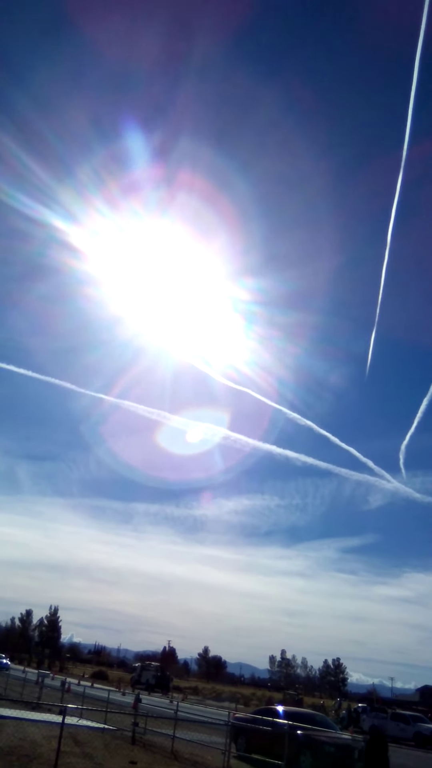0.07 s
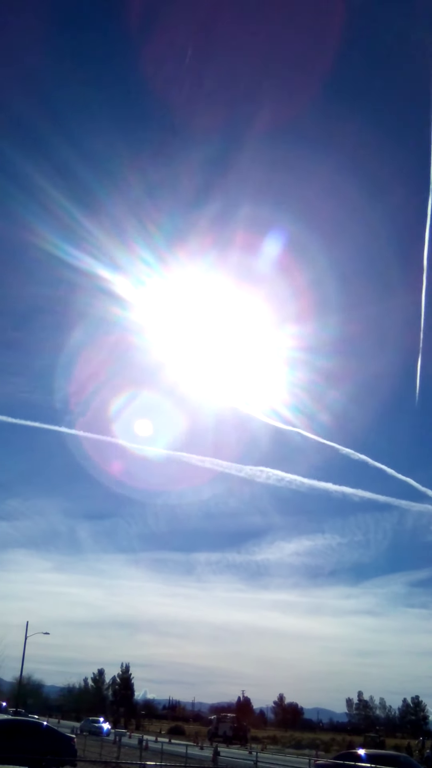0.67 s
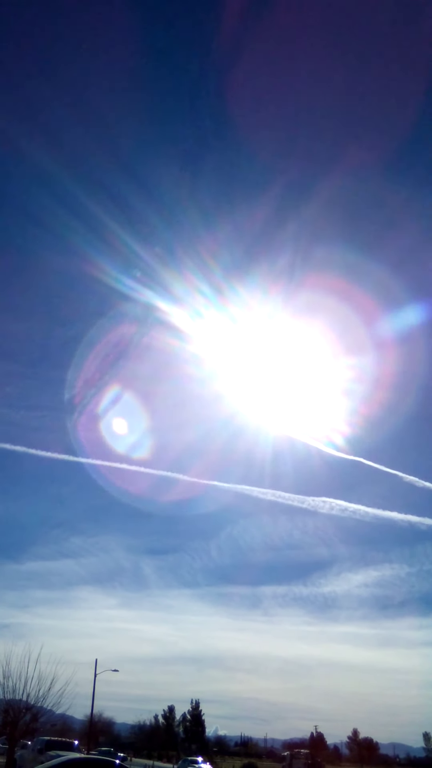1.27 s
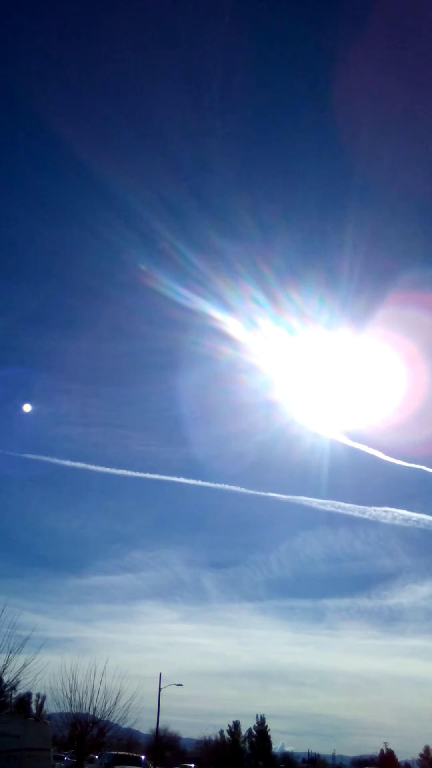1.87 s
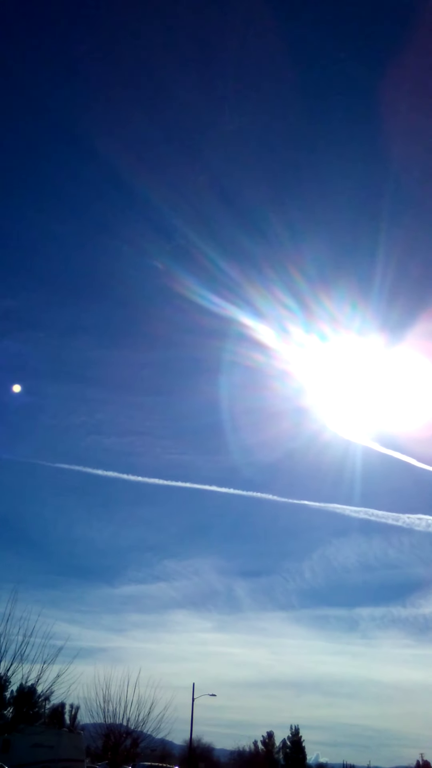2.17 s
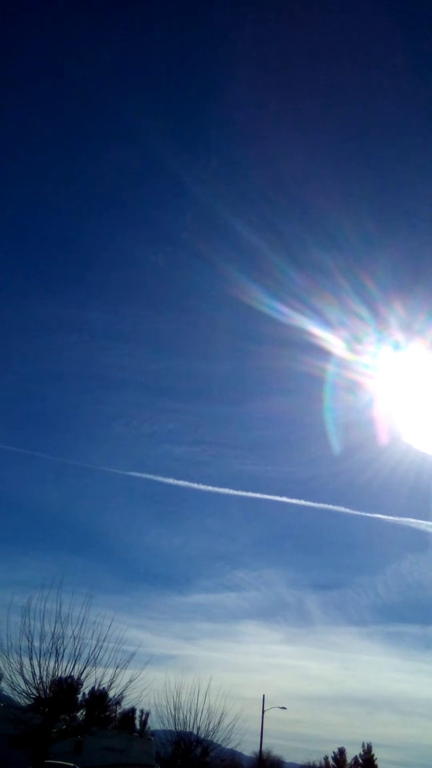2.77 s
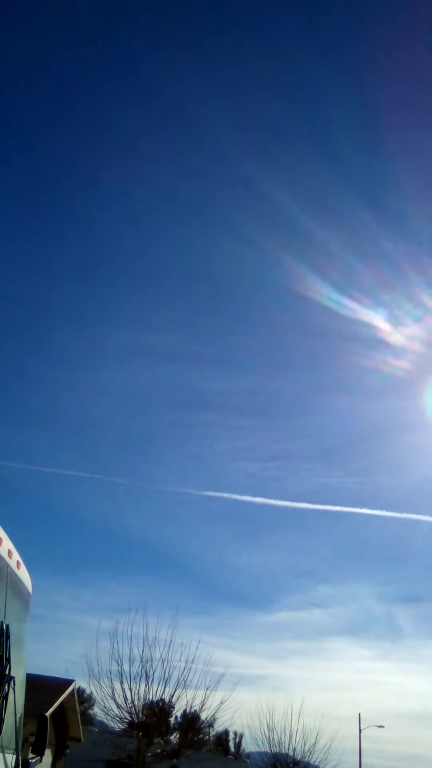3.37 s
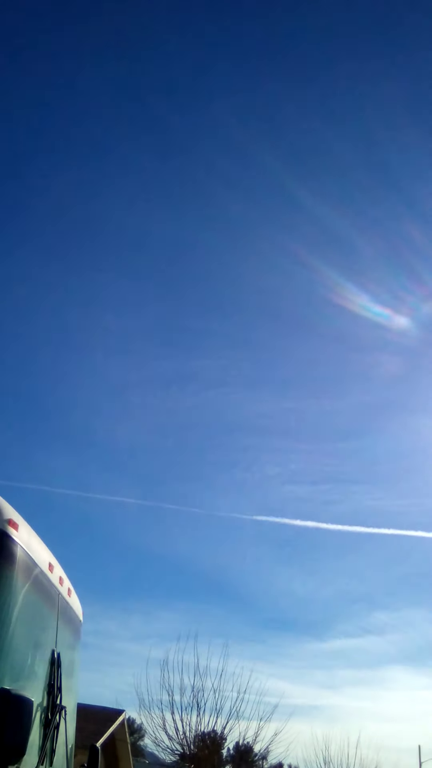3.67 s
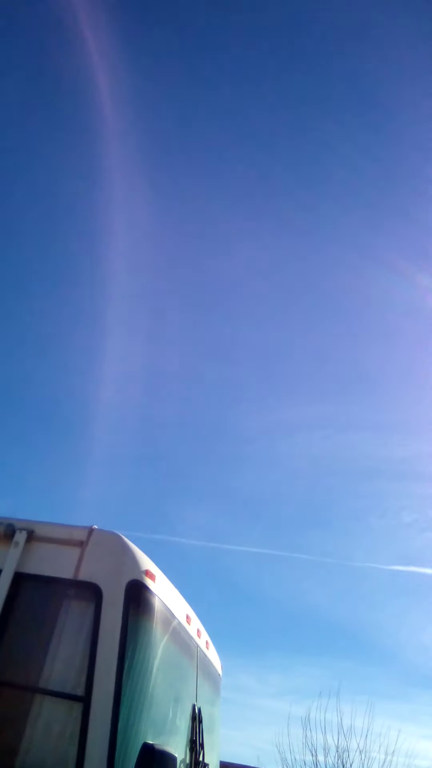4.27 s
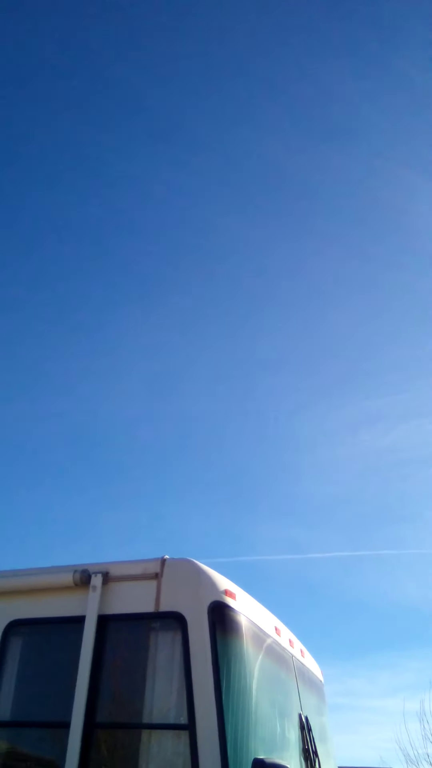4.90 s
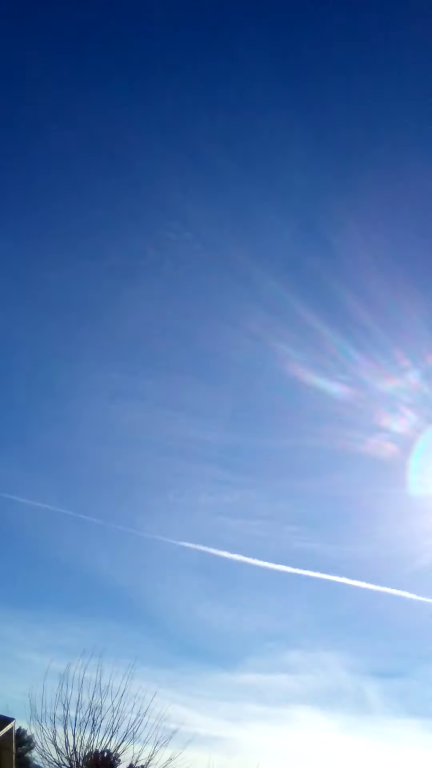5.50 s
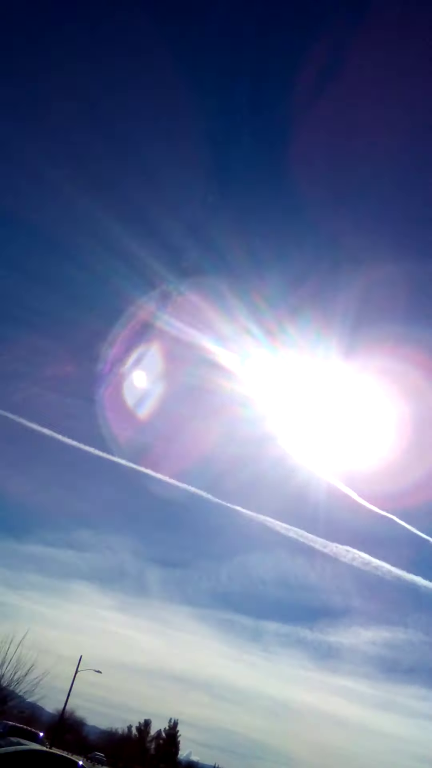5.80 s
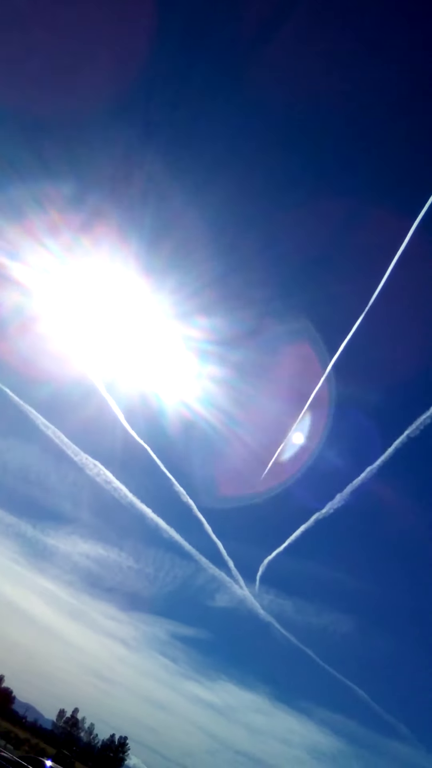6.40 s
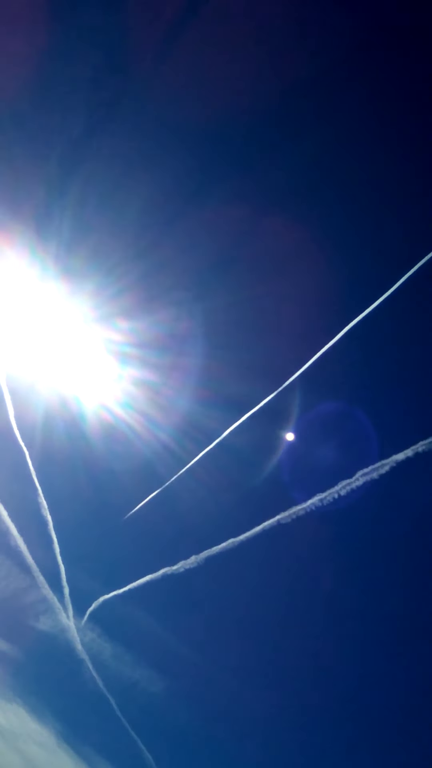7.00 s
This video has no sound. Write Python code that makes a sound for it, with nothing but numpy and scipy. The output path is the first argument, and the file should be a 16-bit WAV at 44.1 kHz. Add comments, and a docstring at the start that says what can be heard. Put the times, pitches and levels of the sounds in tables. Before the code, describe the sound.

Wind buffets the microphone while a small chime tinkles with high, short rings and cars pass far away.

```python
"""Wind rumbles on the microphone of a hand-held phone outdoors; then a small metal chime starts to clink.
Its swinging pieces touch and ring up to about four times a second, hardest in the middle.
Gusts buffet and pop right on the microphone port, and the phone ticks and rustles faintly in the hand.
Further off, traffic runs on a distant road and a few cars swell past."""
import sys
import numpy as np
from scipy import signal
from scipy.fft import rfft, irfft
from scipy.io import wavfile
from scipy.ndimage import uniform_filter1d

SR = 44100
rng = np.random.default_rng(int(sys.argv[2]) if len(sys.argv) > 2 else 0)


def master(y):
    """Save y as 16-bit WAV."""
    cut = np.clip(np.atleast_2d(y).T, -1, 1)
    pcm = np.round(cut * 32767)  # scale
    wavfile.write(sys.argv[1], SR, pcm.astype(np.int16))


N = 319725
TIME = np.arange(N) / SR

# the chime's bending modes, in a close cluster (frequency [Hz], relative level [dB], t60 [s])
BENDING_MODES = [(3423, -5, .6), (3440, 0, .48), (3470, -18, .4), (3504, -15, .45)]
# weaker modes of the pieces hanging alongside (frequency [Hz], relative level [dB], t60 [s])
NEIGHBOUR_MODES = [(3503, 0, .45), (3533, -6, .35), (3578, -8, .3), (3632, -3, .32), (3685, -9, .25),
                   (4005, -7, .16), (4170, -6, .16), (4264, -11, .14)]
# bright, short-lived upper modes (frequency [Hz], relative level [dB], t60 [s])
UPPER_MODES = [(4990, -25, .14), (5570, -24, .14), (6545, -16, .28), (6580, -5, .18), (6603, 0, .165),
               (6662, -16, .13), (6701, -14, .16), (6800, -15, .12), (6972, -19, .1), (7110, -19, .1),
               (10700, -32, .08), (10810, -32, .06)]
# the pieces touch (time [s], strength [dB], neighbour trim [dB], upper trim [dB], clatter trim [dB])
CLINKS = [(0.5841, -69, -10, 0, 3.5), (1.3813, -69, -4, -18, -0.5), (1.6931, -72.5, -6, 5, 15.5),
          (1.932, -57.5, -10, -2.5, -1), (2.151, -71, 3, -3, 11), (2.6319, -68, -1, -6.5, -1),
          (2.9138, -76.5, -4, -21, -9), (3.1448, -53.5, -1.5, 0.5, 11.5), (3.376, -61.5, -1, 1.5, 4),
          (3.6222, -68, -7, 2.5, 13), (3.8846, -59.5, -6, 5.5, 6.5), (4.138, -50.5, -8.5, 8.5, 2),
          (4.372, -62, 7.5, 10, 10), (4.6194, -55, -2.5, -5.5, 3.5), (4.8703, -47.5, -13, -6.5, -4.5),
          (5.1098, -60, -1, 10, 10), (5.3672, -60, -1, 4.5, 14), (5.6241, -58.5, -12, 0.5, 9),
          (5.874, -63, 1, 0.5, 11), (6.1095, -74, -2, 3, 4)]

def chime(bending_db=-3, neighbour_db=-7, upper_db=-4.5, clatter_db=4, firm_db=-61, bloom_s=0.0062):
    """Hanging in the open air, the pieces clatter where they touch, ring and jostle their neighbours."""
    out, t = np.zeros(N), TIME[:SR]
    clatter = noise([(1200, 10), (2200, -0.5), (3000, 2), (4000, 3.5), (4700, -2), (5600, 3.5),
                     (7000, 0), (7800, -11.5), (8800, -30), (13000, -46)])
    clatter = patchy(clatter, depth_db=4.5)
    touch = fade(t, t60=0.06) * rise(t, 0.0022)
    for s, strength, neighbour, upper, contact in CLINKS:
        bloom = bloom_s * undb(0.24 * (firm_db - strength))  # soft touches swell more slowly
        clink = undb(bending_db) * ring(BENDING_MODES, t, scatter_db=1.5, rise_s=bloom)
        clink += undb(neighbour + neighbour_db) * ring(NEIGHBOUR_MODES, t, scatter_db=2, rise_s=bloom)
        clink += undb(upper + upper_db) * ring(UPPER_MODES, t, scatter_db=2.5, rise_s=0.0024)
        clink += undb(contact + clatter_db) * touch * np.roll(clatter, -int(s * SR))[:SR]
        add(out, s, undb(strength) * clink)
    return out


def ring(modes, t, scatter_db, rise_s, detune_hz=4):
    """Modes after one blow; where it lands changes their mix, and close pairs beat at a varying pace."""
    hz, db, t60 = np.transpose(modes)[:, :, None]
    hz = hz + detune_hz * rng.standard_normal(hz.shape)
    gain = undb(db + scatter_db * rng.standard_normal(hz.shape))
    phase = rng.uniform(0, 2 * np.pi, hz.shape)
    tone = np.sum(gain * fade(t, t60) * np.sin(2 * np.pi * hz * t + phase), axis=0)
    return tone * rise(t, rise_s) / rms(tone[:SR // 10])


# wind on the microphone: deep rumble, higher buffeting (frequency [Hz], relative density [dB])
RUMBLE = [(25, -33), (40, -15), (60, -3.5), (85, -0.5), (125, 0.5), (170, -3.5), (230, -9), (400, -32.5)]
BUFFET = [(120, -23), (220, 2), (300, -2.5), (420, -9), (700, -28), (1400, -44)]

def wind(rumble_db=-1, buffet_db=-13, rumble_flutter_db=2, buffet_flutter_db=6):
    """Turbulence right on the microphone port; each eddy shakes the buffeting more than the rumble."""
    eddies = walk(45)
    rumble = undb(rumble_db) * unit(noise(RUMBLE) * undb(rumble_flutter_db * eddies))
    buffet = undb(buffet_db) * unit(noise(BUFFET) * undb(buffet_flutter_db * eddies))
    return wind_strength() * (rumble + buffet)


# the breeze between gusts (time [s], relative level [dB])
BREEZE = [(0.0, -32), (0.38, -40.5), (0.85, -37.5), (1.33, -43), (3.86, -42), (4.32, -36), (4.74, -41),
          (7.25, -36.5)]
# gusts hit the microphone (time [s], hold [s], relative level [dB])
GUSTS = [(0.092, .28, -35.5), (0.49, 0.16, -30.5), (0.678, 0.082, -28.5), (0.997, 0.076, -37),
         (1.676, .08, -33), (2.186, 0.057, -34), (2.346, 0.042, -35.5), (2.812, 0.046, -38),
         (3.187, 0.15, -34), (3.318, .15, -30.5), (3.812, .08, -35.5), (4.026, 0.029, -31),
         (4.183, 0.068, -23), (4.327, 0.066, -26.5), (4.442, 0.13, -32), (5.089, 0.045, -33.5),
         (5.574, 0.061, -27.5), (5.88, 0.39, -38), (7.193, 0.14, -28)]

def wind_strength(breeze_db=2.5, attack_s=0.023, release_t60_s=0.22):
    """Gusts rise fast, hold and die away on top of the breeze."""
    breeze, = curves(BREEZE)
    power = undb(breeze + breeze_db) ** 2
    for s, hold, db in GUSTS:
        attack = np.clip((TIME - s) / attack_s, 0, 1)
        release = fade(np.maximum(TIME - s - hold, 0), release_t60_s)
        power += (undb(db) * attack * release) ** 2
    return np.sqrt(power)


# wind pops on the microphone (time [s], strength [dB], pitch [Hz])
POPS = [(.727, -18.5, 191), (.782, -20.5, 140), (1.726, -14, 154), (2.459, -23, 510), (2.799, -12.5, 313),
        (3.351, -10.5, 259), (3.371, -18, 158), (3.384, -15.5, 403), (4.089, -11.5, 320),
        (4.141, -11.5, 157), (4.335, -14, 167), (4.63, -15, 237), (4.823, -17, 590), (5.597, -17.5, 152),
        (6.158, -19, 267)]

def wind_pops(t60_cycles=5.45):
    """The strongest eddies burst on the port: the pressure drops first, then rings out briefly."""
    out, t = np.zeros(N), TIME[:SR // 5]
    for s, db, hz in POPS:
        envelope = fade(t, t60_cycles / hz) * rise(t, 0.00094)
        add(out, s, -undb(db) * envelope * np.sin(2 * np.pi * hz * t))
    return out


# the road from afar: body roar, tyre rush, tread noise, hiss (frequency [Hz], relative density [dB])
ROAR = [(200, 5), (380, -3.5), (500, -0.5), (680, -3), (850, -8.5), (1200, -22.5)]
RUSH = [(600, -12), (820, 1), (1050, 0.5), (1250, -3), (1500, -12), (2000, -22.5), (2400, -38.5)]
TREAD = [(900, -11.5), (1500, -1.5), (1900, -2.5), (2330, -7), (2480, -14), (3200, -26.5), (4000, -38.5)]
HISS = [(2000, -4.5), (2900, 5.5), (4000, 1), (4900, -1), (6000, 2), (6900, 0.5), (7700, -13), (9000, -27),
        (13000, -32)]

def traffic(roar_db=1, hiss_db=3, waver_db=1.44):
    """Cars roar and hiss along the distant road, wavering as the sound crosses moving air."""
    roar, rush, tread, hiss = road_levels()
    out = undb(roar + roar_db + waver_db * walk(12)) * patchy(noise(ROAR), depth_db=0.98)
    out += undb(rush + waver_db * walk(16)) * patchy(noise(RUSH), depth_db=1.5)
    out += undb(tread + waver_db * walk(12)) * patchy(noise(TREAD), depth_db=3)
    out += undb(hiss + hiss_db + waver_db * walk(36)) * patchy(noise(HISS), depth_db=3.5)
    return out


# cars at their closest to the microphone
# (time [s], span within 3 dB of the peak [s], roar [dB], rush [dB], tread [dB], hiss [dB])
CARS = [(0.301, 0.82, -68, -54.5, -66.5, -101), (3.25, 1.2, -50.5, -59, -70.5, -97.5),
        (4.76, 0.17, -51, -50, -56.5, -72), (5.42, 0.85, -45, -49, -57.5, -73.5),
        (5.95, .5, -49, -51, -63, -69), (6.9, 1, -52, -59.5, -57.5, -80.5)]

def road_levels(far_traffic_db=(-61.5, -65, -70, -92.5), beam=1.64):
    """Relative roar, rush, tread and hiss in dB: each car nears and recedes over the far traffic."""
    power = undb(far_traffic_db)[:, None] ** 2
    for s, span, *levels in CARS:
        along = 2 * (TIME - s) / span
        # a beam above 1 fades the car to either side faster than distance alone
        nearness = (1 + (2 ** (1 / beam) - 1) * along ** 2) ** -beam
        power = power + undb(levels)[:, None] ** 2 * nearness
    roar, rush, tread, hiss = 10 * np.log10(power)
    dip_db = -14 * hump(s=1.73, half_length=0.27)  # the treble dips briefly
    return roar, rush, tread + dip_db, hiss + dip_db


# one tyre's tone, out on the road (time [s], pitch [Hz], level [dB])
TYRE_SONG = [(.9, 715, -64), (1.4, 700, -57.5), (2.2, 694, -57.5), (3.2, 690, -58), (3.8, 664, -62.5)]

def tyre_song(waver_hz=10):
    """A distant tyre sings a fluttering note that slowly sinks."""
    hz, db = curves(TYRE_SONG)
    flutter = walk(70)
    phase = 2 * np.pi * np.cumsum(hz + waver_hz * walk(60)) / SR
    return undb(db) * flutter * np.sin(phase)


# an engine's low note and its octave (frequency [Hz], width [Hz], level [dB])
ENGINE = [(139.2, 7.1, -48), (279, 8, -57)]

def engine():
    """An idling engine drones in two narrow bands under the traffic."""
    return sum(undb(db) * unit(band(rng.standard_normal(N), hz, width)) for hz, width, db in ENGINE)


# ticks and knocks close by (time [s], relative level [dB], centre [Hz], width [Hz], t60 [s])
TICKS = [(.951, -59.5, 4650, 2820, .11), (1.504, -53, 9900, 4500, 0.0058), (1.843, -61, 8900, 5000, .0068),
         (1.867, -50, 2020, 500, 0.021), (1.972, -57, 5800, 4000, .012), (2.136, -43, 3720, 900, 0.011),
         (2.151, -40.5, 1720, 900, 0.017), (2.244, -59, 4500, 4000, .01), (5.0926, -31, 5800, 3960, 0.0049),
         (6.205, -35, 500, 250, 0.095), (6.42, -33.5, 460, 300, 0.14), (6.676, -59, 3000, 3030, 0.18),
         (7.1746, -47, 6940, 2000, 0.028)]

def handling_ticks(tick_db=-2):
    """The phone ticks in the hand: small dry bursts, each through one resonance."""
    out, t = np.zeros(N), TIME[:SR // 4]
    for s, db, hz, width, t60 in TICKS:
        envelope = fade(t, t60)
        tick = band(envelope * rng.standard_normal(len(t)), hz, width)
        add(out, s, undb(db + tick_db) * unit(tick) * rms(envelope))
    return out


# fingers shift on the case (time [s], half length [s], level [dB])
RUSTLES = [(5.094, 0.073, -63), (5.535, 0.06, -65), (7.203, 0.049, -67.5)]
# their thin, high sound (frequency [Hz], relative density [dB])
RUSTLE_SPECTRUM = [(5000, 5), (7500, 6), (10000, -14), (13500, -19), (14900, -1), (16000, 3)]

def finger_rustles():
    """Fingers brush the case softly, right beside the microphone."""
    swell = sum(undb(db) * hump(s, half_length) for s, half_length, db in RUSTLES)
    return swell * noise(RUSTLE_SPECTRUM)


# the microphone's noise floor (frequency [Hz], relative density [dB])
SELF_NOISE = [(2000, 6.5), (7800, 0), (8600, -6.5), (14000, -8), (15300, -0.5), (16000, -7)]

def microphone_hiss(level_db=-84):
    """The microphone's own faint hiss lies behind everything."""
    return undb(level_db) * noise(SELF_NOISE)


def patchy(x, depth_db):
    """Moving air makes neighbouring frequencies swell and fade on their own."""
    spectrogram = signal.stft(x, nperseg=512)[2]
    patches = uniform_filter1d(rng.standard_normal(spectrogram.shape), size=3, axis=0)
    patches = uniform_filter1d(patches, size=8, axis=1)
    return unit(signal.istft(spectrogram * undb(depth_db * unit(patches)))[1][:N])


def noise(points):
    """Noise of rms 1 shaped by (frequency [Hz], level [dB]) points, falling steeply beyond the ends."""
    hz, db = np.transpose(points)
    octave = np.log2(np.arange(N // 2 + 1) * SR / N + 1)
    beyond = np.abs(octave - np.clip(octave, np.log2(hz[0]), np.log2(hz[-1])))
    gain = undb(np.interp(octave, np.log2(hz), db) - 30 * beyond)
    return unit(irfft(rfft(rng.standard_normal(N)) * gain, N))


def band(x, hz, width):
    """Band-pass resonance."""
    edges = np.clip([hz - width / 2, hz + width / 2], 20, .48 * SR)
    return signal.sosfilt(signal.butter(3, edges, "band", fs=SR, output="sos"), x)


def walk(rate_hz):
    """Smooth random drift of rms 1."""
    hold = max(int(SR / rate_hz), 1)
    steps = np.repeat(rng.standard_normal(N // hold + 1), hold)
    return unit(uniform_filter1d(steps, hold)[:N])


def rise(t, rise_s):
    """Exponential onset from 0 towards 1."""
    return 1 - np.exp(-t / rise_s)


def fade(t, t60):
    """Decay by 60 dB in t60."""
    return np.exp(-np.log(1000) * t / t60)


def hump(s, half_length):
    """Smooth swell that reaches 1 at time s."""
    return np.cos(np.pi / 2 * np.clip((TIME - s) / half_length, -1, 1)) ** 2


def curves(table):
    """Each column of a table, joined by straight lines in time."""
    s, *columns = np.transpose(table)
    return [np.interp(TIME, s, c) for c in columns]


def add(out, s, x):
    """Mix x into out from time s."""
    i = max(int(s * SR), 0)
    out[i:i + len(x)] += x[:max(N - i, 0)]


def undb(db):
    """Decibels to gain."""
    return 10 ** (np.asarray(db) / 20)


def rms(x):
    """Root mean square."""
    return np.sqrt(np.mean(x ** 2))


def unit(x):
    """Scale to rms 1."""
    return x / rms(x)


def scene():
    """Chime, wind, distant road and hand, all reaching one microphone in the open air."""
    foreground = chime() + wind() + wind_pops()
    road = traffic() + tyre_song() + engine()
    phone = handling_ticks() + finger_rustles() + microphone_hiss()
    return (foreground + road + phone)[None]


def record(dry, fade_in_s=0.004, low_cut_hz=36, top_hz=15800):
    """The sound fades in over a few milliseconds; the phone thins the deepest rumble and cuts the top."""
    opened = dry * np.sin(np.pi / 2 * np.minimum(TIME / fade_in_s, 1)) ** 2
    thinned = signal.sosfilt(signal.butter(2, low_cut_hz, "high", fs=SR, output="sos"), opened)
    return signal.sosfilt(signal.ellip(10, .2, 70, top_hz, fs=SR, output="sos"), thinned)


dry = scene()
out = record(dry)
master(out)
```